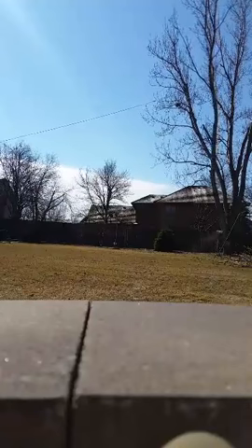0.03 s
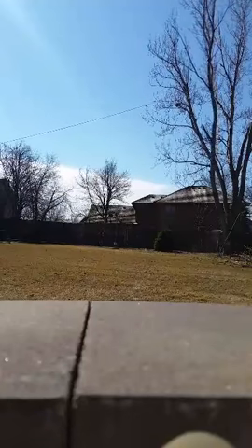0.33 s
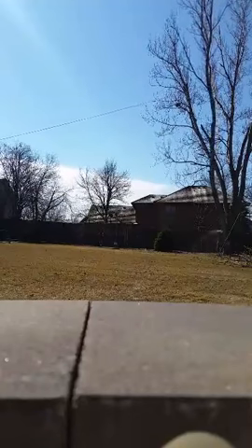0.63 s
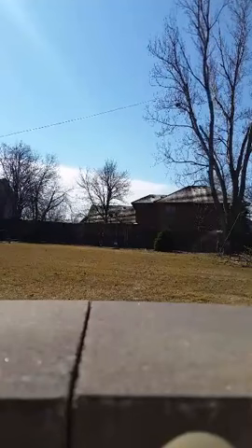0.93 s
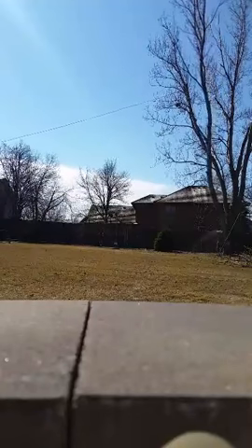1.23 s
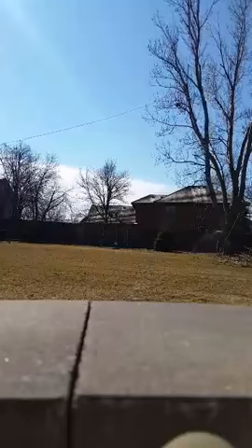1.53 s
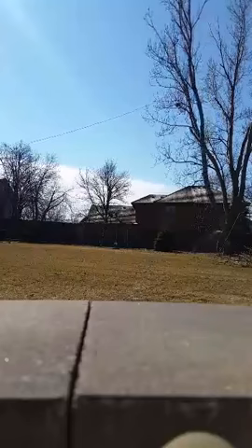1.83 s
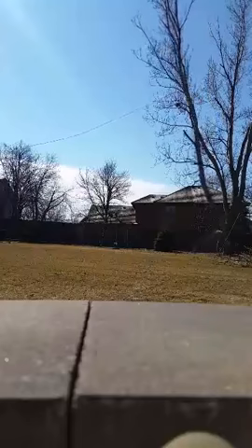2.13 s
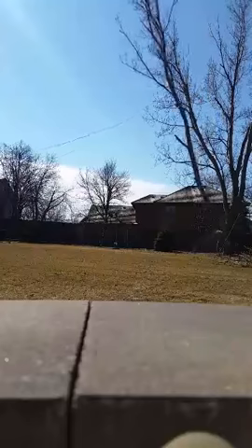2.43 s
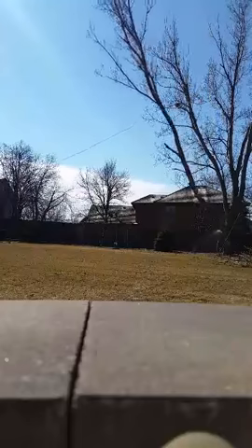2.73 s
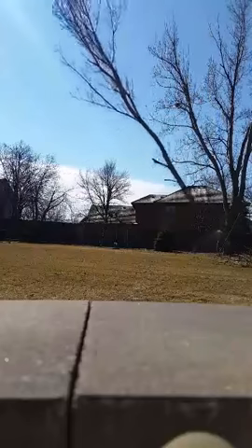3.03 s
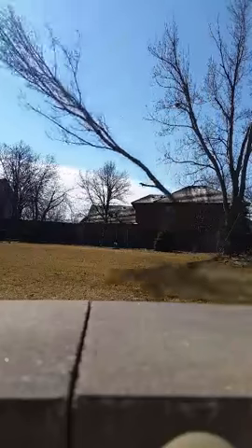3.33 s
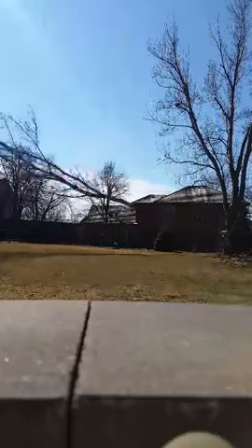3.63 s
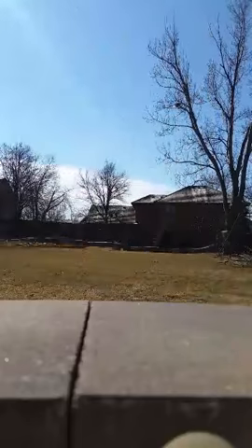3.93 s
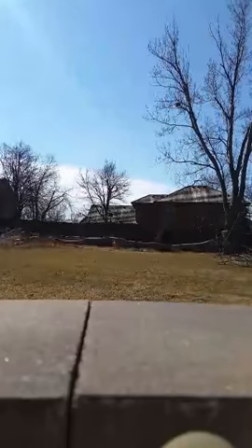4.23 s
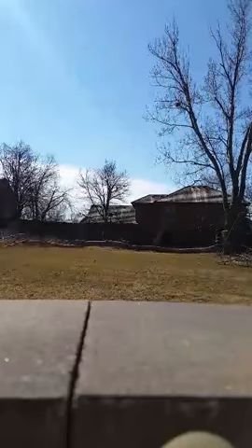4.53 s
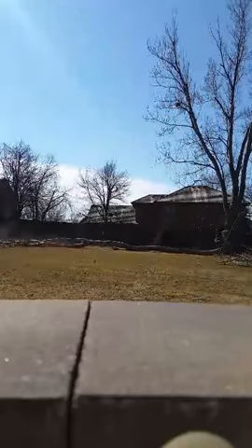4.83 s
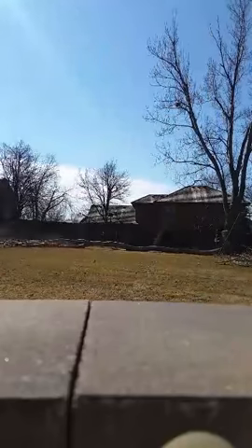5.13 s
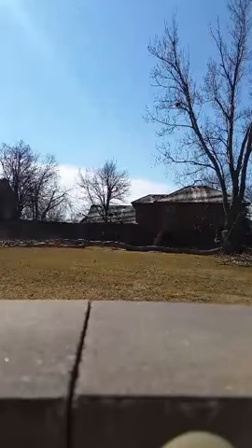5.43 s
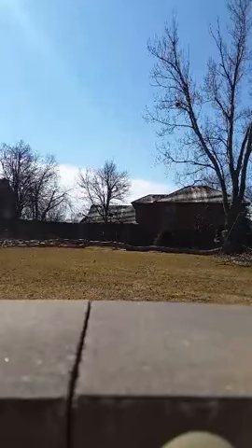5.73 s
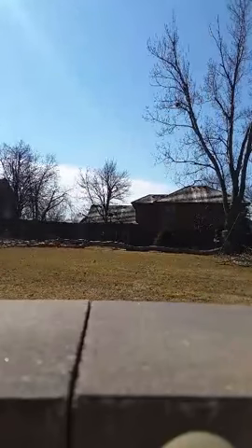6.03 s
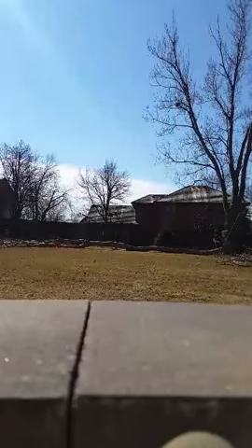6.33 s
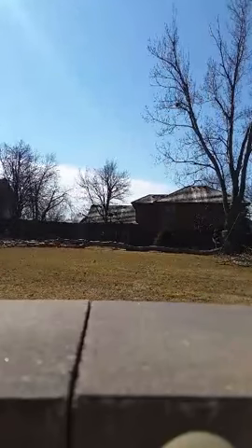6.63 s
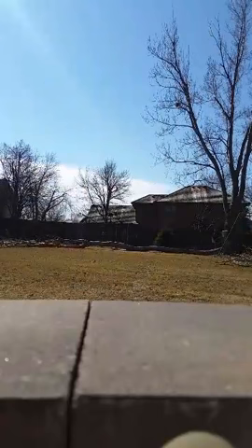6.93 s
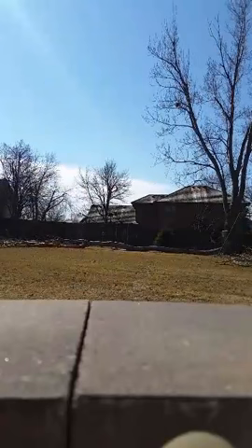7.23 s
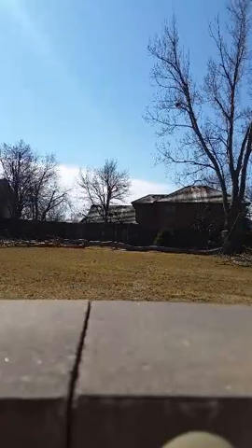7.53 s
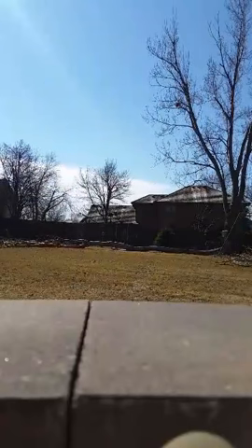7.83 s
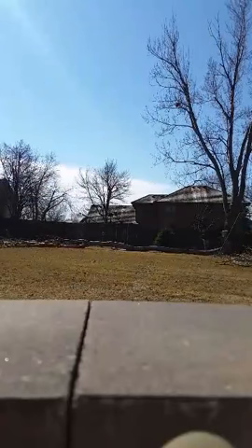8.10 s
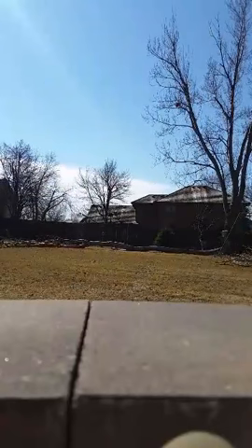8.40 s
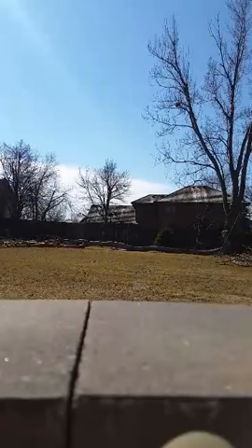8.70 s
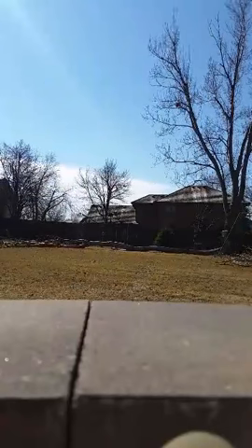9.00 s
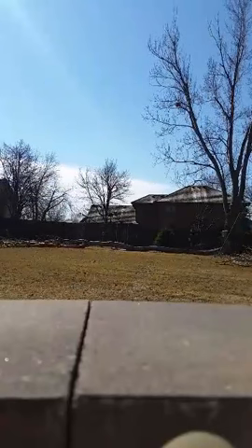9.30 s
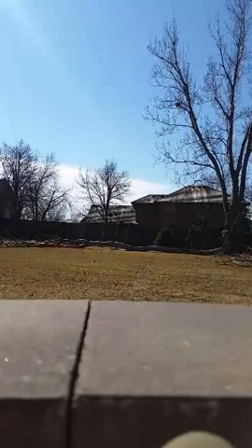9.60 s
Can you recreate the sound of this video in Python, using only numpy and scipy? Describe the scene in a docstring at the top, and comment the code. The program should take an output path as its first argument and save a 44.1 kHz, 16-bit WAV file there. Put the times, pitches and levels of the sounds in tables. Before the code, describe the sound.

A chainsaw surges and sputters in a cut outdoors, with a few sharp cracks of wood echoing round the yard. As the engine winds down, a large tree limb falls with a swish and a loud, deep, splintering crash. A soft puttering idle follows, with snapping twigs and light metallic clinks, until the saw stops with a small clack. Gusts buffet the microphone, and a distant town hums low underneath.

```python
"""In a yard, a chainsaw high in a tree revs and bogs down in the cut; its note throbs against a house echo.
The wood cracks, the treetop swishes down, and branches and trunk crash onto the lawn.
The saw sinks to a rattling idle and is switched off, while twigs snap and metal gear clinks.
Wind bumps the microphone, and a distant town rumbles underneath."""
import sys
import numpy as np
from scipy import signal
from scipy.fft import rfft, irfft
from scipy.io import wavfile
from scipy.ndimage import uniform_filter1d

SR = 44100
rng = np.random.default_rng(int(sys.argv[2]) if len(sys.argv) > 2 else 0)


def transcribe(u):
    """Save the signal u as a 16-bit wav file named by the first command-line argument.

    u: samples, shape (n,) or (channels, n), limited to [-1, 1]; the rate is SR.
    q: integer samples, one column per channel.
    """
    v = np.clip(np.atleast_2d(u).T, -1, 1)
    q = np.round(v * 32767).astype(np.int16)
    wavfile.write(sys.argv[1], SR, q)


N = 430416
TIME = np.arange(N) / SR
FREQS = np.maximum(np.fft.rfftfreq(N, 1 / SR), 1)
THROTTLE_OFF_S, COAST_S, SWITCH_S = 3.24, 7.63, 7.777

# bright hiss of the chain and of whipping twigs: (frequency [Hz], relative level [dB])
HISS = [(4500, -10), (7000, -6.5), (8800, 3.5), (11000, -0.5), (14500, -5), (15500, -26.5)]
# air rushing through the fan or the treetop: (frequency [Hz], relative level [dB])
RUSHING_AIR = [(500, -10.5), (1300, -1.5), (2400, 10.5), (3600, 0), (4450, -2), (6400, -36), (9500, -3),
               (15000, -26.5)]
# how alike left and right sound: (frequency [Hz], likeness [0 to 1])
LIKENESS = [(150, .998), (300, 0.98), (650, 0.79), (1400, 0.06), (2900, 0.74), (6500, 0.17), (12000, 0.091)]


def saw_cutting():
    """The engine fires in quick bursts, heard as a note, overtones, a snarl, rasping gas and chain hiss."""
    # tone of the firings in the muffler: (frequency [Hz], relative level [dB])
    muffler = [(400, -20.5), (600, 4), (1100, 0.5), (1550, -5.5), (1900, -13.5), (2350, 8), (2700, -23.5),
               (3100, 0.5), (3500, -21.5), (4400, -10), (6000, -13.5)]
    # tone of the escaping gas: (frequency [Hz], relative level [dB])
    gas = [(150, -38), (280, -11.5), (420, -5), (600, 1.5), (850, -4), (1250, -5), (1650, -4), (2000, -5.5),
           (2400, -5), (3050, -5), (3600, -11.5), (4400, -11.5), (6200, -19), (10000, -25)]
    hz = engine_speed()
    turns = np.cumsum(hz) / SR
    # the engine sputters whenever it loses speed, and once the throttle is closed
    slowing = uniform_filter1d(-np.gradient(hz) * SR, SR // 10)
    sputter = np.clip(slowing / 400, 0, 1) + ramp(THROTTLE_OFF_S, THROTTLE_OFF_S + .25)
    uneven_turns = turns + (.0075 + .02 * sputter) * wander(110) + .022 * wander(20)
    note = exhaust_note(hz, uneven_turns, sputter)
    bark = exhaust_bark(hz, uneven_turns, sputter)
    rasp_db = follow_speed(hz, db=-31, db_per_octave=7.4, fall_db_per_s=10)
    pulses = firings(turns + .0062 * wander(60), scatter_db=-.5)
    snarl = steady(colour(pulses, muffler)) * gain(rasp_db - 7)
    puffs = unit(2.4 + np.exp(-(turns % 1) / 2.2)) * gain(.81 * wander(30.16))
    rasp = noise(gas, puffs * gain(rasp_db))
    chain = chain_hiss(hz)
    whine = muffler_whine(hz, turns + .007 * wander(45))
    return (note + bark + yard(snarl + whine, echo_db=-10, t60=.28) + rasp + chain) * ramp(4.64, 4.0)


def engine_speed():
    """Firings per second; the heavy flywheel smooths every change."""
    # surging and bogging down in the cut: (time [s], firing rate [Hz])
    revving = [(0, 171), (.17, 195), (.27, 208), (.34, 194), (.4, 172), (.55, 97), (.72, 99), (.82, 140),
               (.89, 152), (.95, 152), (1.08, 178), (1.16, 181), (1.27, 128), (1.45, 170), (1.57, 199),
               (1.69, 203), (1.85, 146), (2.11, 189), (2.25, 170), (2.52, 210), (2.61, 207), (2.74, 138),
               (2.83, 142), (3.07, 157), (3.14, 150), (3.3, 158), (3.45, 112)]
    # running down with the throttle closed: (time [s], firing rate [Hz])
    running_down = [(3.85, 78.9), (4.3, 62), (5.05, 55.6), (5.47, 53.4), (5.94, 45.9), (6.69, 41.6),
                    (7.14, 43.8), (7.4, 36.3), (7.7, 35.1), (8.1, 24)]
    hz, = curves(list(revving) + list(running_down))
    return uniform_filter1d(hz, int(.05 * SR), mode="nearest")


def follow_speed(hz, db, db_per_octave, fall_db_per_s, cutting_hz=170):
    """Level in dB of a layer that follows engine speed and fades once the throttle closes."""
    return db + db_per_octave * np.log2(hz / cutting_hz) - fall_db_per_s * after(THROTTLE_OFF_S)


def exhaust_note(hz, turns, sputter, echo_s=.0785, echo_db=-6):
    """The lowest note. A house sends back the pitch of a moment ago, and the two throb together."""
    # the small outlet gives off no deep bass: (frequency [Hz], relative level [dB])
    outlet = [(35, -25), (75, 3)]
    echo_turns = np.interp(TIME - echo_s, TIME, turns) + hz * np.minimum(TIME - echo_s, 0)
    note = unit(np.sin(2 * np.pi * turns) + gain(echo_db) * np.sin(2 * np.pi * echo_turns))
    level_db = follow_speed(hz, db=-21, db_per_octave=-5.5, fall_db_per_s=102)
    flutter_db = 1.1 * wander(14) + (.8 + 1.6 * sputter) * wander(190)
    return colour(note * gain(level_db + flutter_db), outlet)


def exhaust_bark(hz, turns, sputter, rise_db_per_s=1.45):
    """Low overtones swell or dip as they pass the pitches at which the muffler's chamber rings."""
    # exhaust overtones: (multiple of the firing rate, relative level [dB])
    overtones = [(2, -3), (3, -11), (4, -2), (5, -14), (6, -10.5), (8, -12.5)]
    # chamber resonances: (pitch [Hz], width [Hz], extra gain [factor])
    chamber = [(190.3, 46, 3.5), (360, 19, 0.4), (379, 37, -0.4), (600, 42, 1), (807, 47, 0.48)]
    bark = 0
    for k, db in overtones:
        swell = 1 + sum(extra * bump(k * hz, centre, width) for centre, width, extra in chamber)
        strength = swell * gain(db + 1.5 * wander(35))
        bark += strength * np.sin(2 * np.pi * k * turns + .35 * wander(55))
    level_db = follow_speed(hz, db=-32, db_per_octave=6.1, fall_db_per_s=55)
    level_db += rise_db_per_s * (TIME - THROTTLE_OFF_S / 2)  # barks harder as the cut goes on
    return bark * gain(level_db + 2 * sputter * wander(150))


def muffler_whine(hz, turns):
    """High overtones swell as engine speed sweeps them through the muffler's resonances."""
    # high resonances: (pitch [Hz], width [Hz], relative level [dB])
    resonances = [(1012, 83, 1), (1542, 230, -2), (2430, 140, -1), (3030, 210, -2.5), (4370, 95, -6)]
    whine = 0
    for k in range(5, 23):
        swell = sum(gain(db) * bump(k * hz, centre, width) for centre, width, db in resonances)
        strength = swell * gain(2 * wander(30))
        whine += strength * np.sin(2 * np.pi * (k * turns + rng.random()) + .7 * wander(90))
    return whine * gain(follow_speed(hz, db=-40.5, db_per_octave=13, fall_db_per_s=55))


def chain_hiss(hz):
    """The chain hisses louder the faster it runs, and flares for a moment as it bites."""
    level_db = follow_speed(hz, db=-38, db_per_octave=6.8, fall_db_per_s=15.5)
    bite_db = 7 * bump(TIME, centre=1.07, width=.17)
    return noise(HISS, gain(level_db + bite_db + .97 * wander(60)))


def chain_song():
    """The freed chain sings a wavering tone that sinks as it slows."""
    # the sinking tone: (time [s], pitch [Hz], level [dB])
    glide = [(3.26, 3000, -62), (3.33, 2860, -40), (3.6, 2680, -49), (3.88, 2480, -45), (4.1, 2400, -70)]
    hz, db = curves(glide)
    tone = np.sin(2 * np.pi * np.cumsum(hz + 70 * wander(400)) / SR)
    loudness = gain(db + 2 * wander(90)) * ramp(3.2, 3.3) * ramp(4.2, 4.0)
    return yard(tone * loudness, echo_db=-3, t60=.2)


def saw_idling(coast_db_per_s=45):
    """Slow, uneven firings putter in the muffler and the fan hisses until the engine dies away."""
    # loudness of the idle: (time [s], putter level [dB], rattle level [dB])
    levels = [(3.85, -35.5, -52), (4.65, -41.5, -56), (5.2, -43.5, -50), (6.2, -38.5, -47),
              (7.05, -39, -50), (7.6, -38, -51)]
    # tone of the slow firings: (frequency [Hz], relative level [dB])
    muffler = [(50, -21.5), (100, 0.5), (170, 2), (230, -4), (300, -8.5), (390, -30), (600, -23),
               (1000, -40.5)]
    hz = engine_speed()
    putter_db, rattle_db = curves(levels)
    turns = np.cumsum(hz) / SR + .025 * wander(25)
    pulses = firings(turns + .05 * wander(70), scatter_db=3.5)
    putter = steady(colour(pulses, muffler)) * gain(putter_db - 1)
    # a sinking drone stands out at four times the firing rate
    drone = np.sin(2 * np.pi * 4 * turns) * gain(putter_db - 6 + 5.4 * wander(22)) * ramp(4.1, 4.9)
    rattle = shell_rattle(hz, turns, rattle_db)
    fan = noise(RUSHING_AIR, gain(rattle_db - 4 + wander(25)))
    fade = ramp(THROTTLE_OFF_S, THROTTLE_OFF_S + .24) * gain(-coast_db_per_s * after(COAST_S))
    return (yard(putter, echo_db=4.5, t60=.34) + drone + rattle + fan) * fade


def shell_rattle(hz, turns, level_db):
    """Each engine stroke shakes loose parts together and makes the saw's shell ring."""
    # tone of the loose parts: (frequency [Hz], relative level [dB])
    loose_parts = [(900, -48), (1700, -27), (2120, 2.5), (2540, 4), (2900, -1.5), (3700, -17.5), (4450, -7),
                   (5200, -24), (6500, -47)]
    # notes of the shell: (pitch [Hz], relative level [dB], ring time [s])
    shell = [(2180, -4, .018), (2440, 0.5, .02), (2700, 0, .018), (4400, -11, .012)]
    # single knocks stand out as the engine slows, then merge into a whirr as it coasts
    whirr = .2 * (hz / 50) ** 3 + ramp(7.45, 7.8)
    knocks = uniform_filter1d(np.exp(-(turns % 1) / .17), SR // 300) * gain(2 * wander(45))
    strokes = firings(turns + .04 * wander(45), scatter_db=2.5)
    burst_samples = SR // 200
    chatter = uniform_filter1d(strokes, burst_samples) * np.sqrt(burst_samples) * rng.standard_normal(N)
    ticks = sum(ringing(chatter, pitch, t60) * gain(db) for pitch, db, t60 in shell)
    ticks *= gain(level_db + 8.5) * ramp(7.8, 7.4)
    rattle = noise(loose_parts, steady(whirr + knocks) * gain(level_db - 3.5))
    return (rattle + yard(ticks, echo_db=-9, t60=.3)) * ramp(COAST_S + .58, COAST_S - .15)


def crash():
    """The treetop swishes down, twigs whip the lawn, branches shatter, the trunk lands, twigs rustle."""
    # tone of shattering branches: (frequency [Hz], relative level [dB])
    shatter = [(290, -28.5), (550, 0.5), (1300, -5), (2600, -11.5), (4200, -16), (6000, -24.5),
               (10000, -37.5)]
    # twigs rustle as the treetop settles: (time [s], level [dB], length [s])
    rustles = [(4.5, -57, 0.12), (4.84, -52.5, 0.13), (5.42, -59.5, 0.34)]
    thud = trunk_thud()
    branches_land = landing(4.04, db=-34, hold_s=.2, fall_db_per_s=71)
    branches = noise(shatter, tiny_breaks(per_s=985, spread_db=0) * branches_land)
    twigs_land = landing(4.0, db=-33.5, hold_s=.15, fall_db_per_s=105)
    twigs = noise(HISS, tiny_breaks(per_s=1800, spread_db=4.5) * (twigs_land + swells(rustles)))
    sweep = gain(-42) * bump(TIME, centre=3.92, width=.12)
    swish = noise(RUSHING_AIR, sweep) + noise(HISS, sweep * gain(-4))
    return thud + limb_thumps() + branches + twigs + swish


def trunk_thud():
    """The ground rumbles, building until the whole trunk is down."""
    # tone of the struck ground: (frequency [Hz], relative level [dB])
    ground = [(15, -34.5), (28, -17.5), (80, -2), (108, -2), (150, -2), (205, -1), (275, -6), (365, -16.5),
              (460, -18.5), (700, -30.5), (1500, -64)]
    lands_s, down_s = 4.05, 4.13
    rumble = noise(ground)
    rumble /= np.sqrt(uniform_filter1d(rumble[0] ** 2, SR // 16))  # even out the loudness
    build = gain(-6 * ramp(down_s, lands_s))
    return rumble * landing(lands_s, db=-12.5, hold_s=.15, fall_db_per_s=100) * build


def limb_thumps():
    """Each heavy limb pushes into the turf, which booms briefly at its own pitch."""
    # trunk and limbs hit the lawn in turn: (time [s], level [dB], pitch [Hz])
    hits = [(4.027, -7.5, 117), (4.062, -2.5, 89), (4.136, -3.5, 192), (4.158, -9, 125.6),
            (4.207, -7.5, 216), (4.289, -11.5, 115)]
    booms = sum(ringing(decays([s], [db], t60=1 / SR), hz, t60=.074) for s, db, hz in hits)
    return signal.sosfilt(signal.butter(2, 45, "highpass", fs=SR, output="sos"), booms)


def breaking_wood():
    """Each break is a very short burst of noise that echoes round the yard."""
    # fibres and branches breaking: (time [s], body level [dB], splinter level [dB])
    breaks = [(1.183, -14.5, -19), (1.209, -17, -17.5), (1.756, -12.5, -16), (1.992, -13.5, -28),
              (2.042, -12.5, -20), (2.077, -17.5, -21), (2.35, -12.5, -32), (3.995, -26.5, -25.5),
              (4.047, -23, -20.5), (4.061, -25.5, -12.5), (4.093, -35, -20.5), (4.104, -20.5, -9),
              (4.109, -26.5, -19.5), (4.134, -27, -17)]
    # the loudest twigs snapping: (time [s], level [dB])
    snaps = [(4.489, -33.5), (4.869, -37), (6.046, -28.5), (6.137, -26), (6.223, -26), (6.617, -34),
             (6.715, -23.5), (6.781, -31), (6.835, -27), (6.885, -26.5), (6.956, -20), (7.044, -25.5),
             (7.154, -29.5), (7.201, -32), (7.412, -29)]
    # tones of thick and thin wood breaking: (frequency [Hz], relative level [dB])
    thick_wood = [(300, -5.5), (750, 2), (1400, -0.5), (2500, -5), (4000, -17), (9000, -26)]
    thin_wood = [(700, -21.5), (1600, 2), (2800, 15), (4500, 7), (7000, 0.5), (9500, 8), (13000, -6),
                 (15000, -26)]
    s, body_db, splinter_db = np.transpose(breaks)
    cracks = noise(thick_wood, decays(s, body_db, t60=.022))
    cracks += noise(thin_wood, decays(s, splinter_db, t60=.0084))
    s, snap_db = np.transpose(snaps)
    twigs = noise(thin_wood, uniform_filter1d(decays(s, snap_db - 8, t60=.043), SR // 250))
    # finer twigs crackle in between
    bustle = np.minimum(ramp(5.7, 6.8), ramp(7.7, 7.1))
    crackle = noise(thin_wood, bustle * tiny_breaks(per_s=44, spread_db=5) * gain(-62))
    return yard(cracks, echo_db=-5.5, t60=.66) + yard(twigs + crackle, echo_db=-5.5, t60=.5)


def stop_switch():
    """The saw's switch gives one dry plastic clack."""
    # tone of the plastic: (frequency [Hz], relative level [dB])
    plastic = [(800, -17), (1250, 4), (1750, 10), (2300, -12), (5000, -9.5), (7000, -27),
               (10000, -4), (13000, -30)]
    return noise(plastic, decays([SWITCH_S], [-35], t60=.019))


def metal_gear():
    """Small steel parts brush together, fizz and ring, a little differently at each touch."""
    # the touches: (time [s], ring level [dB], fizz level [dB])
    clinks = [(6.293, -39, -41), (7.351, -50, -47), (7.388, -48, -45), (7.435, -43, -37), (8.096, -52, -55),
              (8.206, -39.5, -42), (8.3, -52, -57), (8.92, -60, -61)]
    # notes of the steel: (pitch [Hz], relative level [dB], ring time [s])
    notes = [(3880, -24, .2), (5830, -21.5, .2), (9950, -16, .06), (13320, -3, .18), (14060, -13, .06)]
    # tone of steel rubbing: (frequency [Hz], relative level [dB])
    rubbing = [(3000, -32.5), (4600, -8), (7500, -40), (10000, 8.5), (11800, -4), (13500, 8.5), (14400, 3),
               (15200, -32)]
    s, ring_db, fizz_db = np.transpose(clinks)
    brushes = uniform_filter1d(decays(s, fizz_db, t60=.08), SR // 200)
    jingle = noise(rubbing, brushes * gain(3 * wander(150)))
    for hz, note_db, t60 in notes:
        touch_db = ring_db + note_db + 2 * rng.standard_normal(len(s))
        touches = uniform_filter1d(decays(s, touch_db, t60), SR // 250)
        # the loose parts chatter against each other as they ring
        jingle += touches * gain(3 * wander(120)) * np.sin(2 * np.pi * hz * TIME + .6 * wander(150))
    return yard(jingle, echo_db=-13.5, t60=.56)


def far_echo(fall_db_per_s=32):
    """A soft wash of noise stands for the idle's echo off far houses, and outlasts the engine."""
    # tone of the echo: (frequency [Hz], relative level [dB])
    wash = [(300, 9.5), (900, 2), (1600, 2), (2600, -1.5), (4500, -2.5), (7000, -47)]
    return noise(wash, ramp(4.4, 5.5) * gain(-57 - fall_db_per_s * after(SWITCH_S)))


def wind(rise_db_per_s=1.0, sheltered_db=-9):
    """A rising breeze and its gusts bump the microphone, harder on the left than on the sheltered right."""
    # gusts and sharp bumps: (time [s], level [dB], length [s])
    gusts = [(1.8, -42, 0.037), (3.52, -28.5, 0.086), (6.18, -32, 0.12), (6.238, -27, 0.022),
             (6.659, -27, 0.01), (6.78, -31.5, .22), (8.0, -42, 0.079), (8.91, -24, 0.02),
             (9.102, -15.5, 0.0084), (9.201, -20.5, 0.038), (9.28, -27.5, 0.1), (9.522, -20, 0.014)]
    # tone of the swirling air: (frequency [Hz], relative level [dB])
    rumble = [(15, -20.5), (40, -4), (80, 4.5), (130, -3.5), (210, -15.5), (380, -32), (900, -58),
              (3000, -110)]
    breeze = gain(-50 + rise_db_per_s * TIME + 4.65 * wander(14))
    eddies = noise(rumble, breeze + swells(gusts), likeness=[(50, 1.0), (300, .85)])
    return eddies * gain([[0], [sheltered_db]])


def town():
    """The distant town blends into a low, almost steady noise."""
    # tone of the town: (frequency [Hz], relative level [dB])
    murmur = [(60, -17), (140, -13.5), (300, -26.5), (500, -29), (850, -32.5), (1300, -45), (2000, -53.5),
              (3100, -62), (4020, -54), (5500, -66), (7300, -81.5), (9200, -61.5), (13400, -65),
              (15000, -78.5)]
    return noise(murmur, gain(-45 + .31 * wander(6.8)))


def yard(x, echo_db, t60):
    """Adds the echoes from fence, walls and trees, which fade by 60 dB in t60 seconds."""
    t = TIME[:SR]
    tails = unit(rng.standard_normal((2, SR)) * gain(-60 * t / t60) * (t > .008)) / np.sqrt(SR)
    echoes = signal.fftconvolve(np.atleast_2d(x)[:1], tails, axes=1)[:, :N]
    return (x + gain(echo_db) * stereo(*rfft(echoes))) / np.sqrt(1 + gain(2 * echo_db))


def gain(db):
    """Turns decibels into a factor to multiply by."""
    return 10 ** (np.asarray(db) / 20)


def unit(x):
    """Scales a signal to an average power of 1."""
    return x / np.sqrt(np.mean(x ** 2))


def steady(x):
    """Scales a signal to an average power of 1 over every quarter second."""
    return x / np.sqrt(uniform_filter1d(x ** 2, SR // 4) + 1e-12)


def curves(table):
    """Joins the values in each column of a table by straight lines in time."""
    s, *columns = np.transpose(table)
    return [np.interp(TIME, s, column) for column in columns]


def ramp(start, end):
    """Rises from 0 to 1 between two times (falls if they are reversed)."""
    return np.clip((TIME - start) / (end - start), 0, 1)


def after(start):
    """Seconds gone by since a moment, zero before it."""
    return np.maximum(TIME - start, 0)


def bump(x, centre, width):
    """A smooth hill of height 1."""
    return np.exp(-((x - centre) / width) ** 2)


def swells(rows):
    """Loudness curve with one smooth swell for each row."""
    return sum(gain(db) * bump(TIME, s, length) for s, db, length in rows)


def landing(s, db, hold_s, fall_db_per_s, rise_s=.04):
    """Loudness curve that rises until time s, holds, then dies away."""
    return ramp(s - rise_s, s) * gain(db - fall_db_per_s * after(s + hold_s))


def decays(times, dbs, t60):
    """Loudness curve of sudden blows, each fading by 60 dB in t60 seconds."""
    blows = np.bincount((np.asarray(times) * SR).astype(int), gain(dbs), N)
    return signal.lfilter([1], [1, -np.exp(-np.log(1000) / (t60 * SR))], blows + 1e-18)


def tiny_breaks(per_s, spread_db, fade_s=.0031):
    """Loudness curve of many random breaks; spread_db makes a few stronger than the rest."""
    sizes = (rng.random(N) < per_s / SR) * gain(spread_db * np.minimum(rng.exponential(size=N), 4))
    power = signal.lfilter([1], [1, -np.exp(-1 / (fade_s * SR))], sizes ** 2)
    return unit(np.sqrt(power + 1e-18))


def wander(per_s):
    """A random wobble of typical size 1 that heads for a new value per_s times a second."""
    steps = TIME * per_s
    levels = rng.standard_normal(int(steps[-1]) + 2)
    return unit(np.interp(steps, np.arange(len(levels)), levels))


def firings(turns, scatter_db):
    """One pulse of random size at each whole engine turn, shared between two samples."""
    at = np.interp(np.arange(1, int(turns[-1])), turns, np.arange(N))
    size = gain(scatter_db * rng.standard_normal(len(at)))
    i, late = at.astype(int), at % 1
    return (np.bincount(i, size * (1 - late), N + 1) + np.bincount(i + 1, size * late, N + 1))[:N]


def ringing(blows, hz, t60):
    """One fading note, struck again by every blow."""
    pole = np.exp((2j * np.pi * hz - np.log(1000) / t60) / SR)
    return signal.lfilter([1], [1, -pole], blows + 1e-18).imag


def across(points):
    """Fills in a (frequency [Hz], value) table for every frequency."""
    hz, value = np.transpose(points)
    return np.interp(np.log(FREQS), np.log(hz), value)


def colour(x, tone):
    """Filters a sound by a tone table; white noise would keep its power."""
    return irfft(rfft(x) * unit(gain(across(tone))), N)


def stereo(mid, side, likeness=LIKENESS):
    """Mixes the spectra of two unrelated sounds into left and right sound, most alike in the bass."""
    alike = np.clip(across(likeness), 0, 1)
    side = side * np.sqrt((1 - alike) / (1 + alike))
    return irfft(np.array([mid + side, mid - side]), N)


def noise(tone, loudness=1, likeness=LIKENESS):
    """Stereo noise, shaped by a loudness curve and then by a tone table."""
    mid, side = rfft(rng.standard_normal((2, N)) * loudness) * unit(gain(across(tone)))
    return stereo(mid, side, likeness)


def scene():
    """Everything in the yard, added together."""
    saw = saw_cutting() + chain_song() + saw_idling() + far_echo()
    return saw + crash() + breaking_wood() + stop_switch() + metal_gear() + wind() + town()


def record(dry, top_hz=15400):
    """The microphone is brighter on the left than on the right; the highest treble is cut off."""
    # balance of the two sides: (frequency [Hz], left minus right [dB])
    balance = [(220, 0), (400, -1), (700, -2), (1300, 2), (2400, 3.5), (4400, 4), (6300, 6), (8100, 15),
               (15000, 19)]
    lean = gain(across(balance) * np.array([[.5], [-.5]]))
    heard = irfft(rfft(dry) * lean / np.sqrt(np.mean(lean ** 2, axis=0)), N)
    return signal.sosfilt(signal.ellip(8, .2, 70, top_hz, fs=SR, output="sos"), heard)


dry = scene()
out = record(dry)
transcribe(out)
```